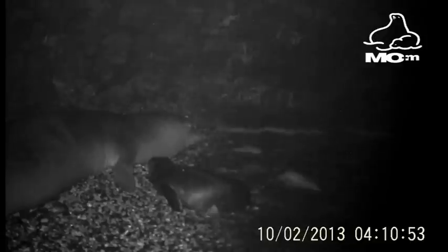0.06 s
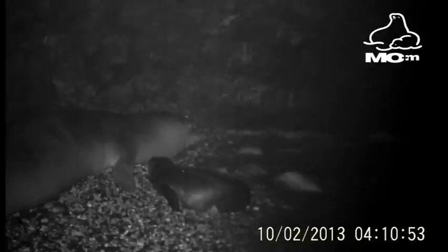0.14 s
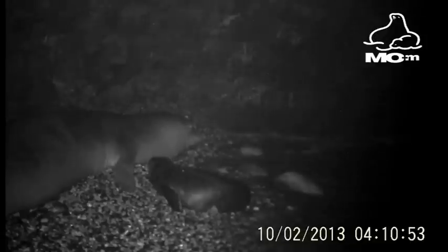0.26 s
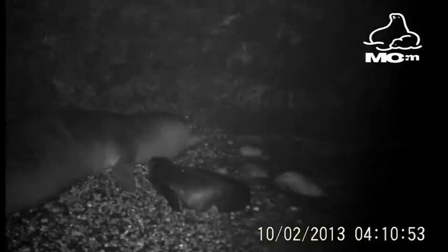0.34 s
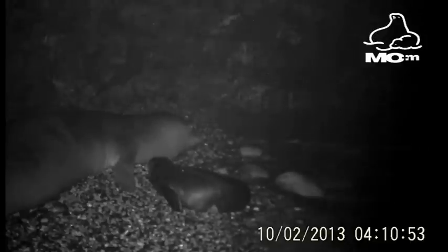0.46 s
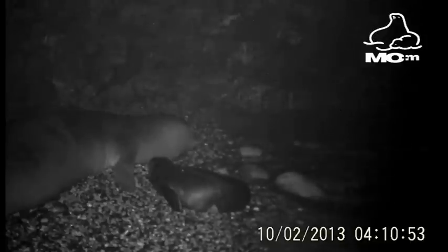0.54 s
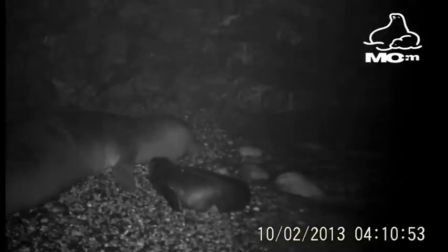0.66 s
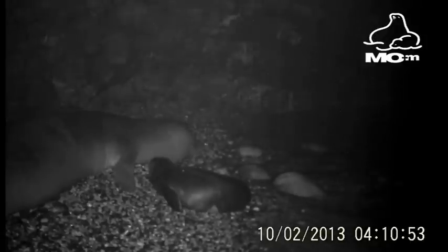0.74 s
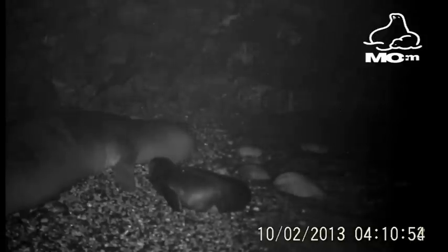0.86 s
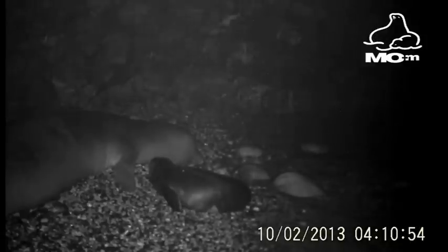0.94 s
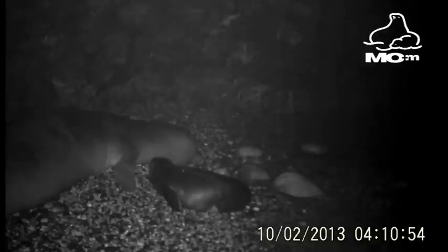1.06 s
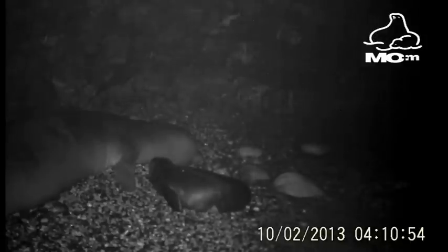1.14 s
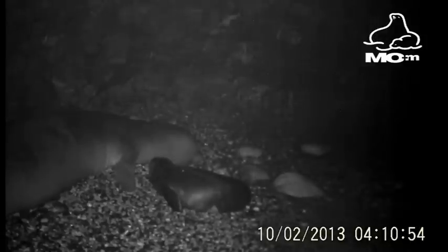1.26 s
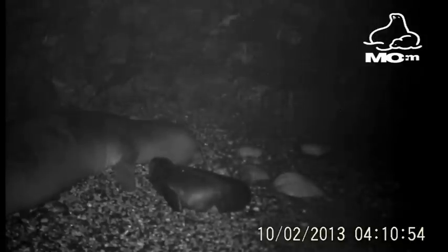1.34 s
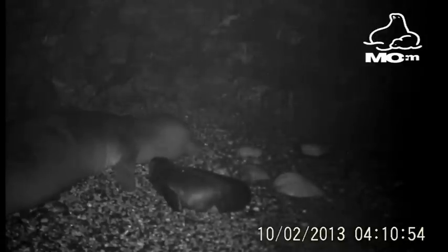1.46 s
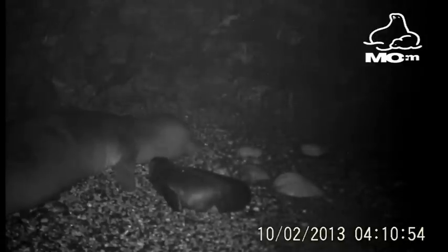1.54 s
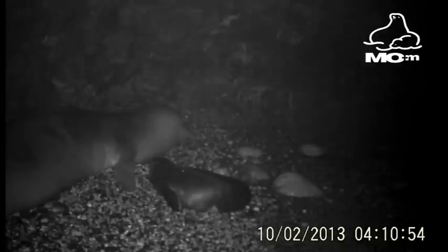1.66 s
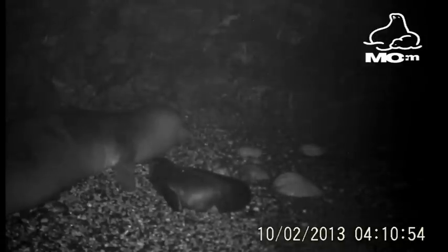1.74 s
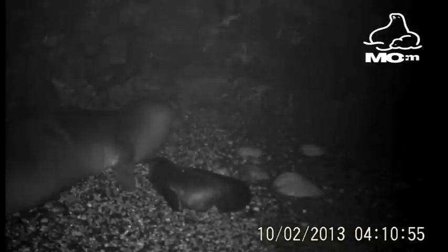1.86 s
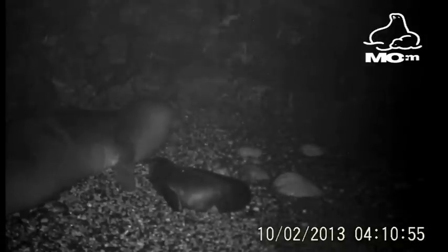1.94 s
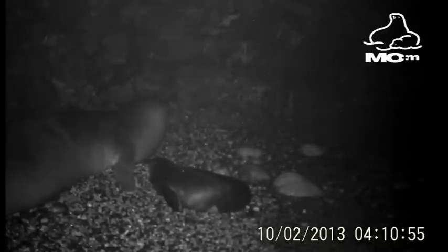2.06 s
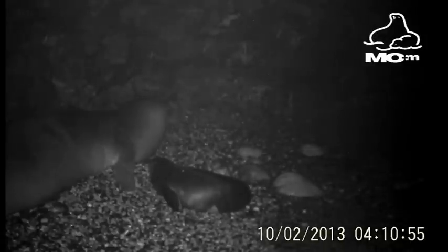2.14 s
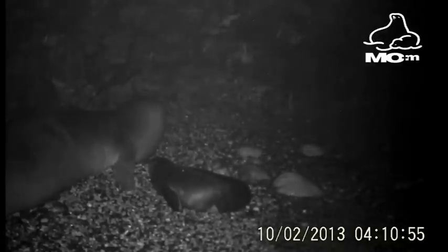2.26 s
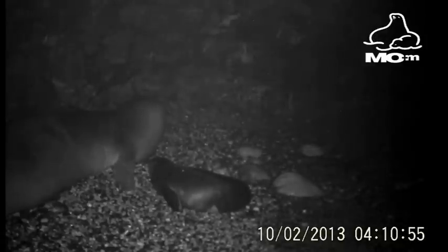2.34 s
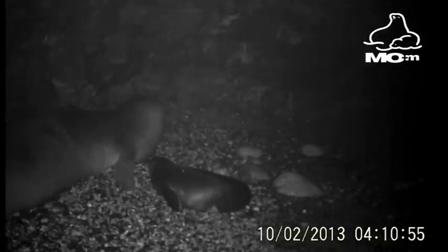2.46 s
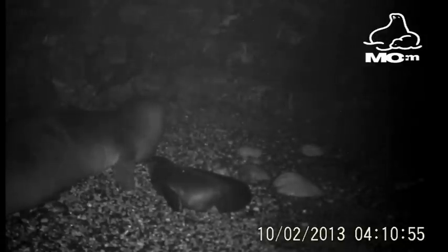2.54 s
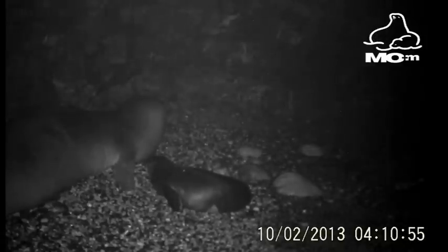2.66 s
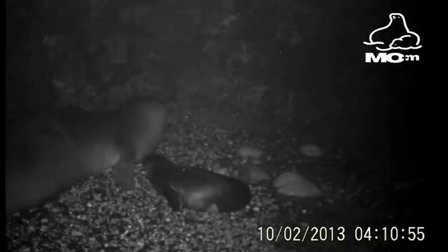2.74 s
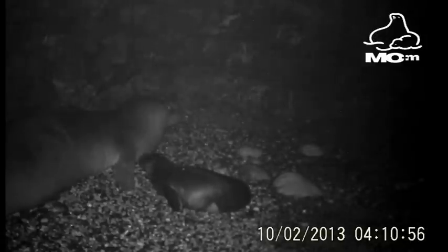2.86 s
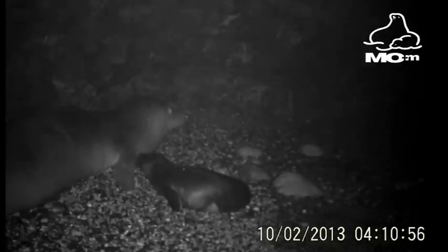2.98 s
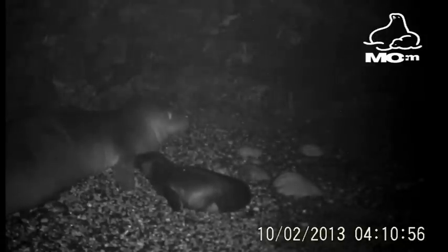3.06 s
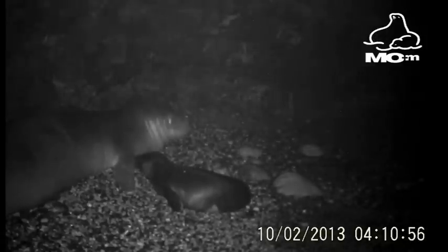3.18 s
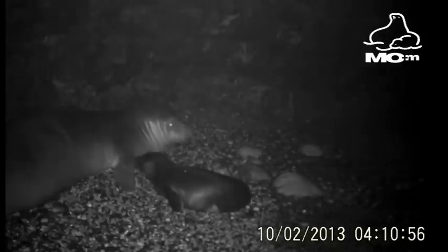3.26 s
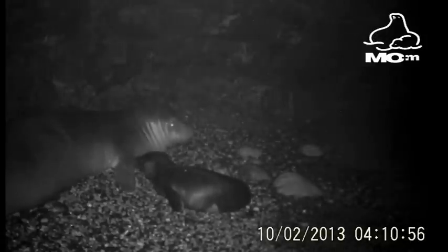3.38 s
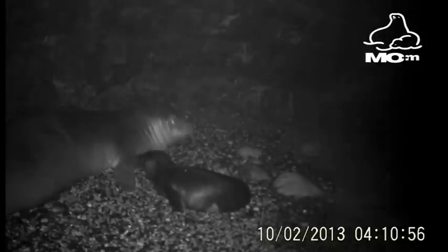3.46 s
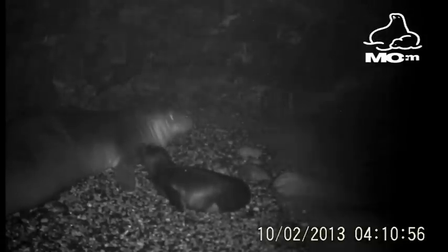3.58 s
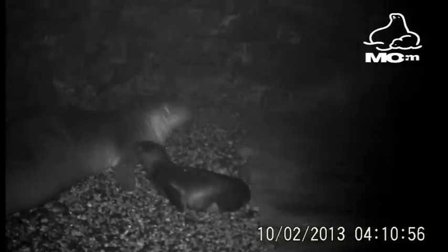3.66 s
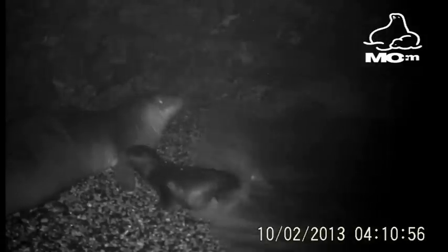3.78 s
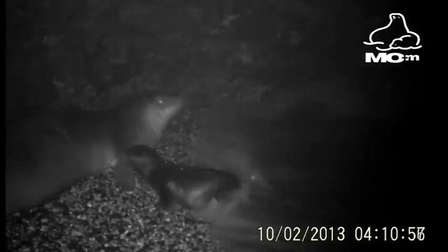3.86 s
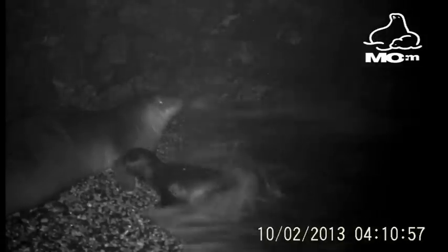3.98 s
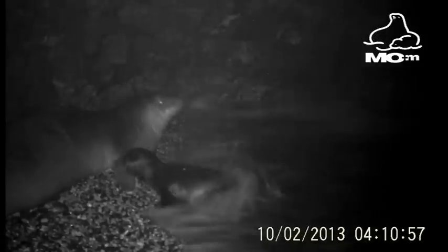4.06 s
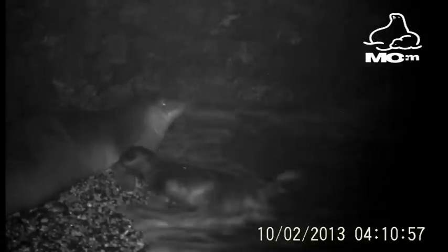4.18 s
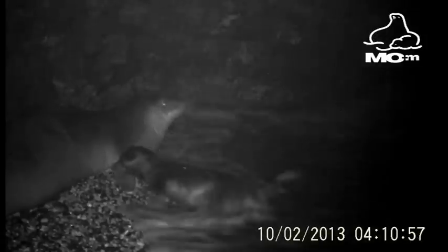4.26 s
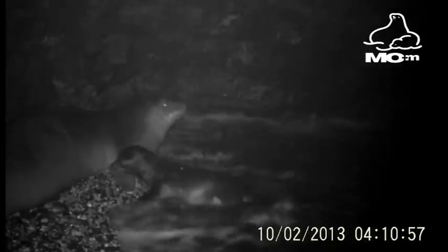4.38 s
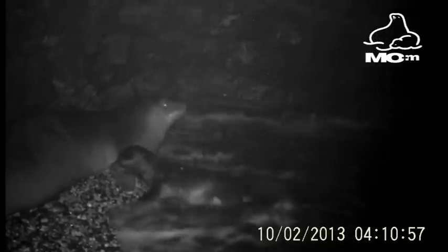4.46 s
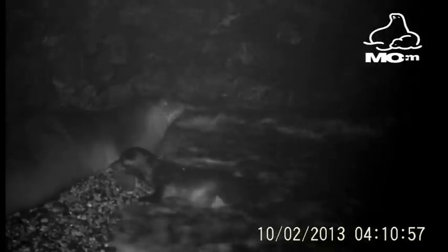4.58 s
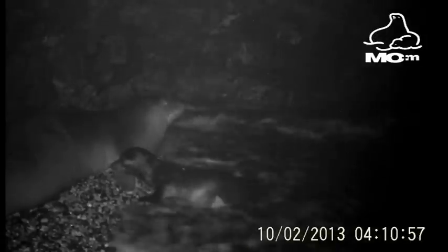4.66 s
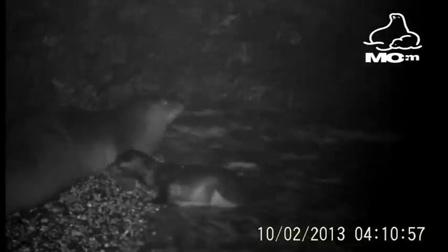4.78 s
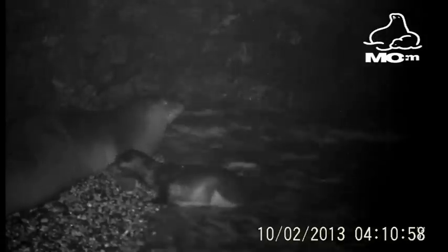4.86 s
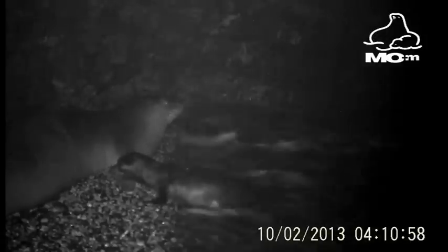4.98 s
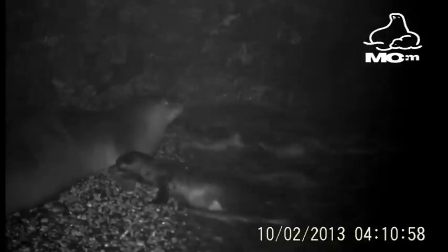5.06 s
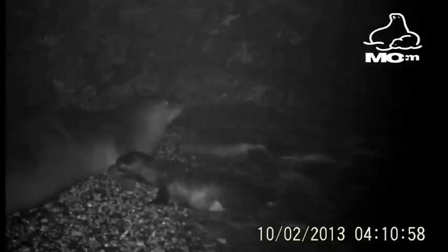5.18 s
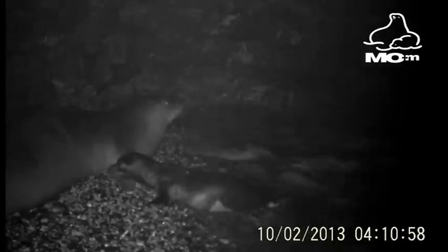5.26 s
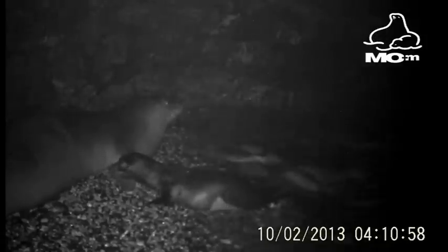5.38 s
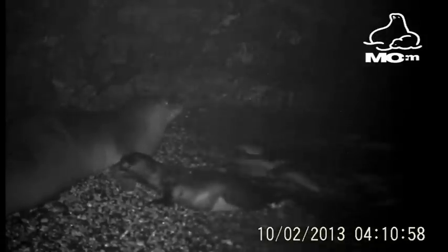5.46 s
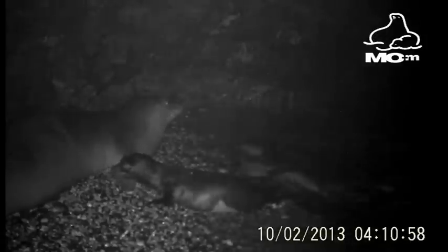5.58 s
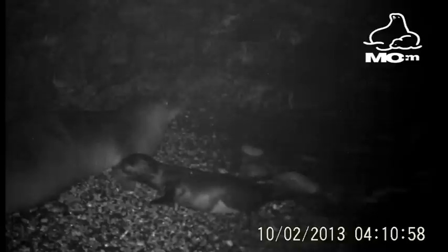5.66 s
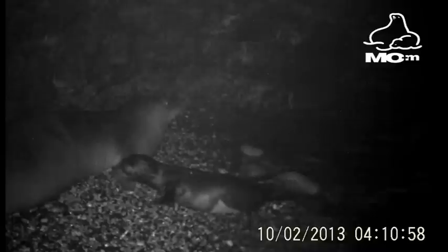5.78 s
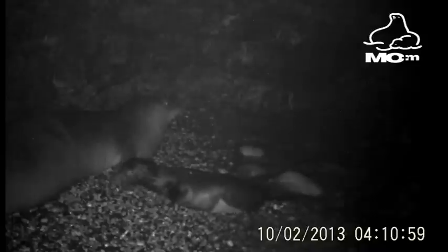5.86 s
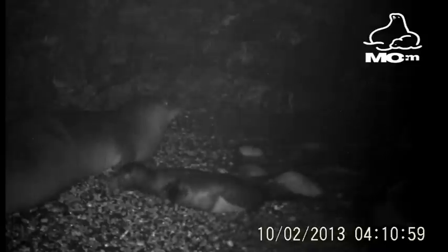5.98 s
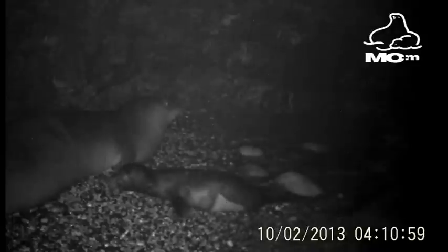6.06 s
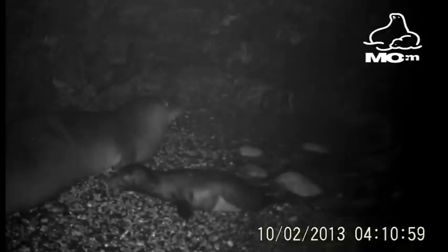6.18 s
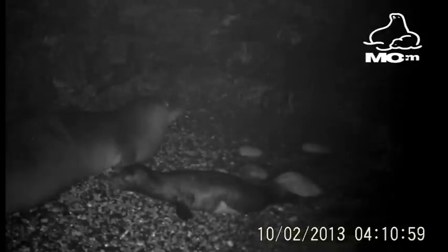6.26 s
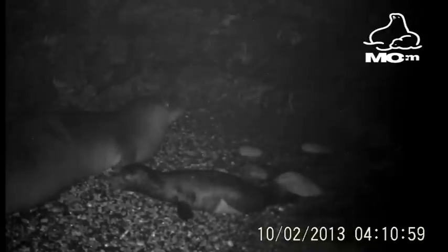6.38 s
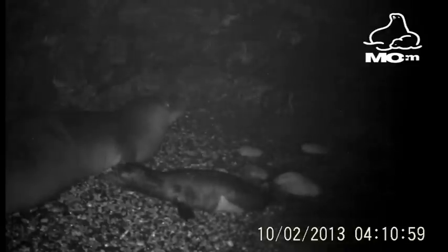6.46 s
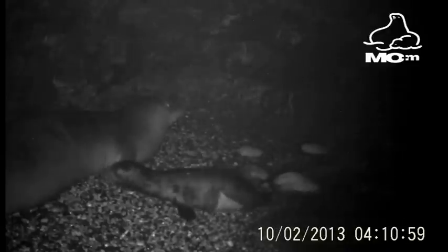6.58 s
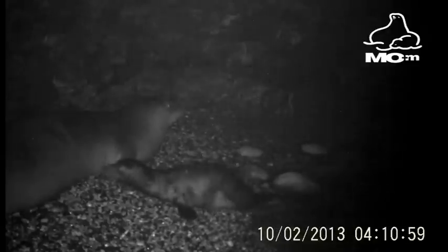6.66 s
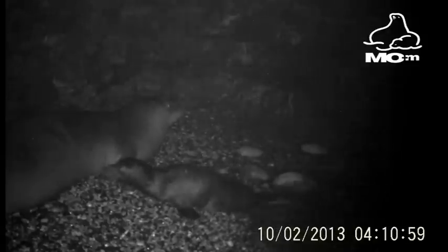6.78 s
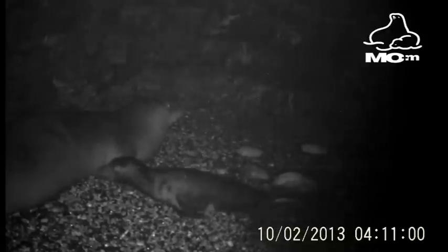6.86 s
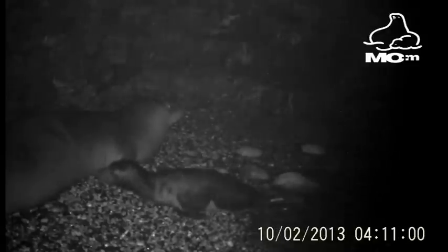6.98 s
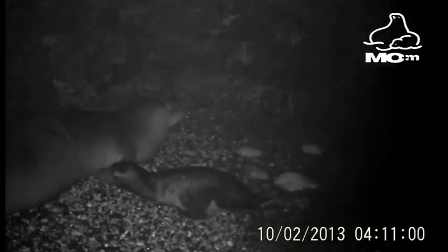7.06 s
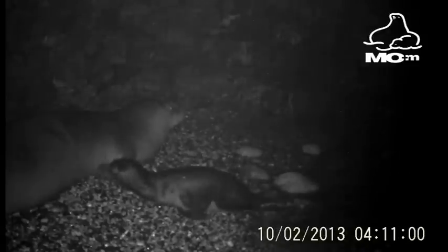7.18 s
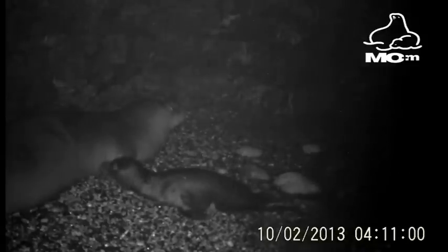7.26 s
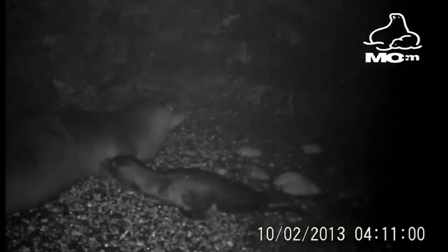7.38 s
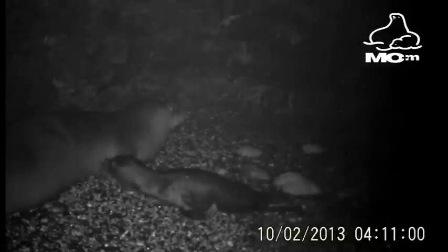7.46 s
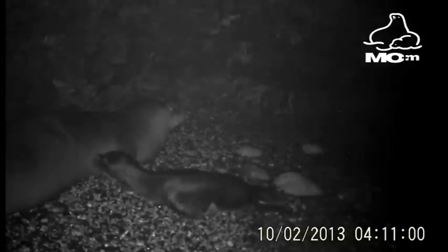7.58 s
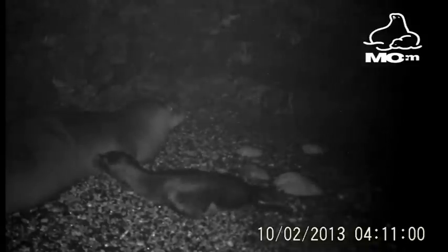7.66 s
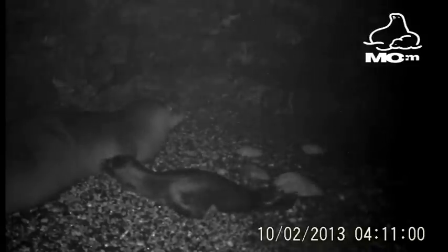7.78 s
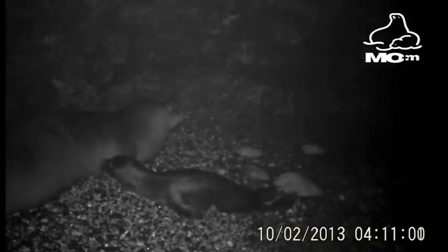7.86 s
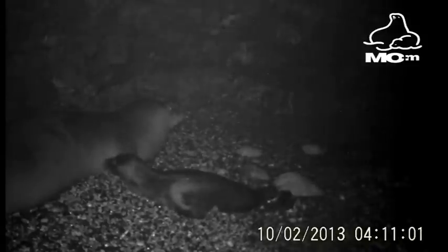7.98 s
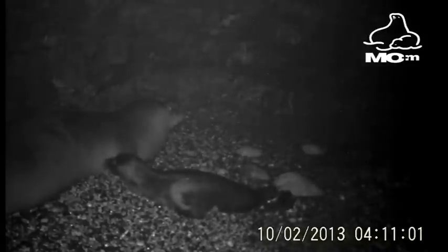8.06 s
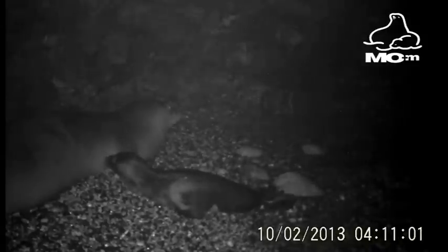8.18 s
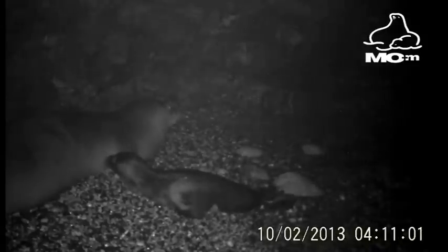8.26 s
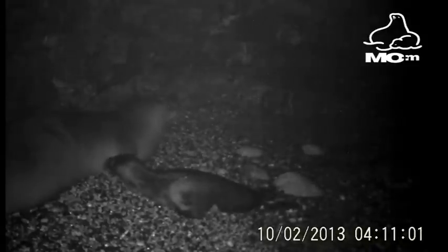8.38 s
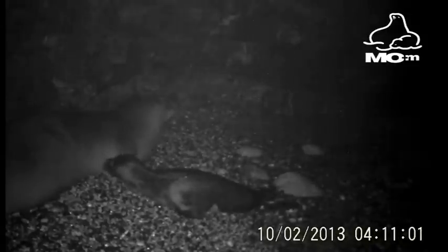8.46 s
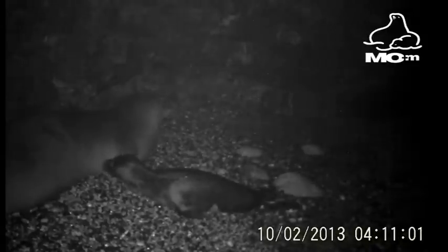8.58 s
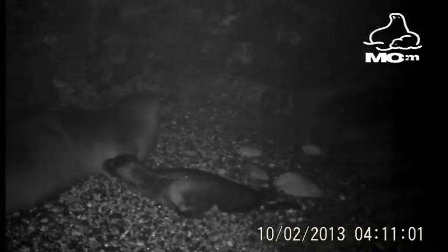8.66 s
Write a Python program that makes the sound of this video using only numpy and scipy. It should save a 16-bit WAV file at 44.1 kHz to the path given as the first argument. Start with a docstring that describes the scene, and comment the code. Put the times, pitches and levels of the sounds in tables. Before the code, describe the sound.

Sea water gurgles and splashes in a rocky cave, with two swells surging in and foaming over the pebbles.

```python
"""Water gurgles and splashes in a rocky sea cave, then swells surge in and break on the shingle.
Pockets of trapped air slosh and gulp, foam seethes over the pebbles, spray hisses, and underneath
the water mass booms in the cave air. One microphone: near bubbles ring singly, distant ones merge
into a wash, and the rock walls smear the splashes, gulps and ringing booms a little."""
import sys
import numpy as np
from scipy import signal
from scipy.fft import rfft, irfft, next_fast_len
from scipy.io import wavfile

SR = 44100
rng = np.random.default_rng(int(sys.argv[2]) if len(sys.argv) > 2 else 0)


def materialize(psi):
    """Save the field psi as 16-bit PCM at rate SR to the path in sys.argv[1].

    A 1-D psi becomes a single channel; in a 2-D psi each row is a channel.
    """
    bounded = np.clip(np.atleast_2d(psi).T, -1, 1)
    quanta = np.round(bounded * 32767).astype(np.int16)
    wavfile.write(sys.argv[1], SR, quanta)


N = 384988

# churning water: t/s, slosh of large air pockets/dB, gurgle of smaller ones/dB
CHURN_LEVELS = [(0.0, -46.5, -47), (0.58, -46.5, -42), (1.0, -45, -42.5), (1.58, -49, -46),
                (2.89, -38.5, -36), (3.06, -33, -31), (3.23, -32.5, -28), (3.55, -44.5, -37),
                (4.01, -38.5, -37.5), (4.3, -46, -42.5), (4.6, -46.5, -41.5), (4.84, -40, -40.5),
                (5.91, -44.5, -45.5), (6.15, -51, -40), (6.61, -44.5, -47), (7.15, -51, -48.5),
                (7.76, -49, -41), (8.12, -31.5, -31), (8.24, -28, -28.5), (8.41, -26, -28),
                (8.58, -31.5, -28.5), (8.73, -29.5, -33.5)]
# white water: t/s, foam on the shingle/dB, fine spray/dB
WHITE_WATER_LEVELS = [(0.0, -43.5, -44.5), (0.34, -46.5, -41.5), (0.58, -40.5, -39), (0.95, -42, -40),
                      (1.41, -47, -46), (1.73, -45, -45.5), (2.48, -39.5, -38.5), (2.63, -36.5, -38.5),
                      (2.89, -32, -34), (3.09, -28.5, -33.5), (3.21, -29.5, -30.5), (3.5, -29.5, -35.5),
                      (3.84, -30, -36.5), (4.23, -35, -44), (4.38, -39.5, -45.5), (4.71, -40.5, -43),
                      (5.54, -39, -36.5), (5.93, -40.5, -38), (6.2, -37, -39), (6.64, -44, -42.5),
                      (7.1, -43, -45.5), (7.34, -44, -42.5), (7.73, -43.5, -40), (8.0, -35, -34.5),
                      (8.09, -33, -35), (8.34, -29, -32), (8.73, -30.5, -35.5)]
# wavelets slapping over the stones, at their peaks: t/s, slosh/dB, gurgle/dB, foam/dB
WAVELET_SLAPS = [(.32, -45, -55, -54), (.39, -37.5, -43, -44), (.78, -46, -39, -40.5), (.87, -39, -53, -55),
                 (1.09, -36.5, -37, -37.5), (1.3, -44, -42, -43), (1.43, -50, -51, -51),
                 (1.6, -51, -60, -46), (1.75, -38.5, -49, -42.5), (2.06, -40, -46, -56),
                 (2.23, -41, -44, -52), (2.6, -42, -53, -46), (2.9, -34, -31.5, -34),
                 (3.03, -24.5, -29, -30.5), (3.35, -29.5, -29, -31.5), (3.57, -43, -35, -39),
                 (3.82, -49, -36, -36), (3.91, -43, -36, -34.5), (5.57, -42, -40.5, -43),
                 (5.63, -43, -38, -43), (6.01, -37.5, -37, -43), (6.2, -38, -45, -50),
                 (6.25, -40, -40, -50), (6.47, -48, -40.5, -42.5), (6.83, -50, -45, -44.5),
                 (6.95, -52, -38.5, -42.5), (7.05, -39.5, -41, -47), (7.17, -35, -40.5, -53),
                 (7.49, -51, -46, -48), (7.76, -44, -45, -40), (8.03, -31, -36, -36.5),
                 (8.24, -37, -34, -41), (8.43, -34, -31, -38)]
# splashes on rock: t/s, level/dB, f/Hz, rise/s, time to fall 60 dB/s
ROCK_SPLASHES = [(0.369, -29, 2500, .012, 0.16), (.52, -37, 4500, .0005, .03),
                 (0.5353, -19.5, 2600, 0.00055, 0.016), (0.537, -34, 2500, 0.0011, .1),
                 (.829, -39, 3000, .002, 0.063), (0.988, -27, 2000, 0.0011, 0.033),
                 (1.072, -31, 900, 0.0035, 0.073), (1.43, -36, 3500, 0.0016, .1),
                 (1.68, -29, 5000, 0.018, .2), (1.706, -28.5, 3500, .002, 0.077),
                 (1.885, -35, 4000, .002, .06), (2.994, -16, 500, .004, 0.095),
                 (4.49, -34.5, 6000, .01, 0.16), (5.57, -26.5, 400, .01, 0.11),
                 (5.624, -27, 800, .005, 0.088), (6.226, -26, 700, .005, 0.092),
                 (6.715, -34, 4000, .002, .06), (6.831, -33, 2000, .006, 0.11),
                 (6.919, -35, 4000, 0.0023, 0.042), (7.042, -25.5, 600, .004, 0.12),
                 (7.48, -36, 2500, 0.0073, 0.099), (7.71, -31, 4000, .01, 0.23),
                 (7.938, -26.5, 1200, .003, 0.11), (8.187, -20, 2500, .004, 0.14)]
# air pockets gulping, drops plopping, low ringing booms of the cave air: t/s, peak/dB, starting f/Hz
GULPS_AND_BOOMS = [(.2049, -39, 4263), (.3035, -27.5, 216), (.33, -31, 210), (.3791, -33, 646),
                   (0.384, -33, 120), (.4834, -38, 480), (.732, -32, 238), (.7526, -29, 250),
                   (.828, -34, 370), (.921, -32, 610), (.97, -37, 135), (1.084, -31, 112), (1.155, -38, 65),
                   (.9517, -32, 427), (1.0763, -26.5, 504), (1.2839, -35, 710), (1.4309, -34, 4800),
                   (1.73, -36, 375), (2.2232, -30, 210), (2.32, -36, 38), (2.87, -27, 204),
                   (2.9956, -16.5, 184), (2.9961, -32, 594), (3.13, -29, 55), (3.29, -27, 64),
                   (3.3201, -25, 580), (3.36, -33, 64), (3.326, -24, 173), (3.369, -36, 256),
                   (3.8329, -31, 4300), (3.915, -27, 249), (4.86, -34, 31), (4.92, -37, 32),
                   (4.931, -35, 109), (5.03, -29.5, 32), (5.05, -30.5, 62.4), (5.551, -34, 674),
                   (5.603, -32, 334), (5.625, -32, 620), (6.1753, -32.5, 1227), (6.1942, -44, 210),
                   (6.228, -34, 660), (6.8439, -34, 2060), (7.0418, -26, 110), (7.1529, -27, 1130),
                   (7.163, -35, 1240), (7.2042, -30.5, 370), (7.466, -32, 156), (7.4929, -35, 2433),
                   (7.75, -30.5, 134), (7.7692, -30, 550), (8.0079, -29, 2050), (8.1999, -21, 1350),
                   (8.2332, -16.5, 192), (8.3818, -21, 195), (8.552, -18.5, 219)]
# swells thudding into the cave mouth, at their peaks: t/s, fall/s, deep heave/dB, boom/dB
SWELL_THUDS = [(.73, 0.071, -47, -38), (1.17, 0.059, -53, -37), (1.9, 0.092, -48, -47),
               (2.34, 0.15, -37, -52), (2.87, .05, -46, -60), (3.04, 0.07, -35, -32.5),
               (3.31, 0.1, -46, -32.5), (4.25, .08, -55, -43.5), (4.88, .2, -43, -38.5),
               (5.15, 0.073, -42, -41.5), (5.55, 0.076, -41.5, -34), (5.96, .1, -39, -38.5),
               (7.05, 0.071, -39, -33.5), (7.4, .15, -43, -48), (7.94, .08, -44, -36.5),
               (8.08, 0.17, -37, -43), (8.56, 0.053, -35, -32.5)]
# the colour of each layer: f/Hz, relative level/dB
SLOSH_SPECTRUM = [(60, -26), (110, -2.5), (170, -1.5), (218, 3.5), (265, 0.5), (340, -12.5), (600, -37)]
GURGLE_SPECTRUM = [(200, -36), (330, 1), (450, 0), (620, -1), (850, -5), (1200, -12), (2500, -26)]
FOAM_SPECTRUM = [(400, -22.5), (800, -6), (1200, -2), (1700, -2), (2600, -4), (3600, -9), (5500, -13.5),
                 (11000, -47)]
SPRAY_SPECTRUM = [(1200, -33), (2500, -4), (3600, -2.5), (5000, -3), (6500, -6), (8000, -9), (11000, -15)]
HEAVE_SPECTRUM = [(15, -5), (27, 7), (38, 5), (50, -2.5), (90, -49)]
BOOM_SPECTRUM = [(30, -32.5), (48, -4), (64, -1.5), (85, -8), (120, -12.5), (250, -47)]

SLAP_SPRAY_DB = -2.5   # spray thrown by a slap, against its foam
RING_SHORTEST_S, RING_CYCLES, RING_GLIDE = .0027, 1.05, .015   # glide: log pitch ratio per swell time
HEAVE_REST_DB, BOOM_REST_DB, RUMBLE_WAVER_DB = -54, -54.5, 5.5   # rumble between thuds
CAVE_T60_S, ROCK_CUT_HZ, CAVE_DB = .29, 7500, -12
PREAMP_OFFSET, CUTOFF_HZ = .0026, 10130


def churn(slosh_slaps, gurgle_slaps):
    """Air trapped in the churning water rings: large pockets slosh, smaller ones gurgle."""
    slosh_db, gurgle_db = in_time(CHURN_LEVELS)
    slosh = bubbles(SLOSH_SPECTRUM, per_s=700, cycles=2.8, spread_db=3.7, far_share=.68, clump_db=-2.6)
    gurgle = bubbles(GURGLE_SPECTRUM, per_s=900, cycles=16.4, spread_db=3.2, far_share=.75, clump_db=.15)
    return gain(slosh_db, slosh_slaps) * slosh + gain(gurgle_db, gurgle_slaps) * gurgle


def white_water(foam_slaps):
    """Small bubbles burst by the thousand: foam seethes on the shingle and spray hisses above it."""
    foam_db, spray_db = in_time(WHITE_WATER_LEVELS)
    foam = bubbles(FOAM_SPECTRUM, per_s=4000, cycles=4.3, spread_db=1.3, far_share=.77, clump_db=.83)
    spray = bubbles(SPRAY_SPECTRUM, per_s=9000, cycles=7.3, spread_db=3, far_share=.72, clump_db=.6)
    thrown = foam_slaps * from_db(SLAP_SPRAY_DB) ** 2
    return gain(foam_db, foam_slaps) * foam + gain(spray_db, thrown) * spray


def bubbles(spectrum, per_s, cycles, spread_db, far_share, clump_db):
    """Near bubbles burst at random and ring down 60 dB in `cycles`; far ones merge into noise. Rms 1."""
    sizes = from_db(spread_db * np.minimum(rng.exponential(1, N), 4)) * rng.choice([-1, 1], N)
    born = rng.random(N) < per_s / SR
    pitch_index = rng.integers(0, 14, N)
    ringing = 0
    for k, hz in enumerate(np.geomspace(spectrum[0][0], spectrum[-1][0], 14)):
        decay = from_db(-60 * hz / (cycles * SR))
        resonator = [1, -2 * decay * np.cos(2 * np.pi * hz / SR), decay * decay]
        kicks = sizes * born * (pitch_index == k) + 1e-18
        ringing += np.sqrt(hz) * rms_one(signal.lfilter([1, 0, -1], resonator, kicks))   # even power/Hz
    near = np.sqrt(1 - far_share) * coloured(ringing, spectrum)
    far = np.sqrt(far_share) * coloured(rng.standard_normal(N), spectrum)
    clumping = from_db(clump_db * drift(18))
    return rms_one((near + far) * clumping)


def slaps():
    """Wavelets slap over the stones and set the trapped air going: power of slosh, gurgle and foam."""
    times, *peaks_db = np.transpose(WAVELET_SLAPS)
    return bursts(times, peaks_db, rise_s=.029, fall_s=.038)


def splashes():
    """Water hits rock: a band of noise rises fast and dies away; the shortest ones crack."""
    out, t = np.zeros(N), np.arange(SR // 2) / SR
    for s, level_db, hz, rise_s, t60_s in ROCK_SPLASHES:
        start = round(s * SR)
        band = signal.butter(1, [hz / 3.6, hz * 1.26], "band", fs=SR, output="sos")
        noise = rms_one(signal.sosfilt(band, rng.standard_normal(len(t))))
        envelope = from_db(level_db - 60 * t / t60_s) * (1 - np.exp(-t / rise_s))
        out[start:start + len(t)] += (envelope * noise)[:N - start]
    return out


def gulps_and_booms():
    """Air pockets gulp, drops plop, the cave air booms low: each a slightly rising tone that dies away."""
    out, t = np.zeros(N), np.arange(SR // 5) / SR
    for s, level_db, hz in GULPS_AND_BOOMS:
        start = round(s * SR)
        swell_s = RING_SHORTEST_S + RING_CYCLES / hz   # low tones are slower
        age = t / swell_s
        pitch_hz = hz * np.exp(RING_GLIDE * np.minimum(age, 4))
        tone = np.sin(2 * np.pi * np.cumsum(pitch_hz) / SR)
        envelope = from_db(level_db) * age * np.exp((1 - age ** 1.5) / 1.5)
        out[start:start + len(t)] += (envelope * tone)[:N - start]
    return out


def swell_rumble():
    """Swells thud into the cave mouth and the air inside heaves and booms; between thuds it rumbles."""
    times, fall_s, *peaks_db = np.transpose(SWELL_THUDS)
    heave_thuds, boom_thuds = bursts(times, peaks_db, rise_s=.045, fall_s=fall_s)
    heave_gain = gain(HEAVE_REST_DB + RUMBLE_WAVER_DB * drift(1.5), heave_thuds)
    heave = coloured(rng.standard_normal(N), HEAVE_SPECTRUM)
    boom_gain = gain(BOOM_REST_DB + RUMBLE_WAVER_DB * drift(2.7), boom_thuds)
    boom = coloured(rng.standard_normal(N), BOOM_SPECTRUM)
    return heave_gain * heave + boom_gain * boom


def cave_echo(x):
    """The walls return a dense tail, 8 ms behind the direct sound and dulled by the wet stone."""
    t = np.arange(SR) / SR
    tail = rng.standard_normal(SR) * from_db(-60 * t / CAVE_T60_S) * (t > .008)
    tail = signal.sosfilt(signal.butter(1, ROCK_CUT_HZ, fs=SR, output="sos"), tail)
    return signal.fftconvolve(x, tail / np.sqrt(np.sum(tail ** 2)))[:N]


def bursts(times, peaks_db, rise_s, fall_s):
    """Power envelopes, one per dB column: each event climbs to its peak and falls away."""
    grid = np.arange(0, N + 100, 100)
    since_peak = grid[:, None] / SR - times
    shapes = np.exp(-np.where(since_peak < 0, -since_peak / rise_s, since_peak / fall_s))
    return [np.interp(np.arange(N), grid, shapes @ from_db(db) ** 2) for db in peaks_db]


def gain(steady_db, burst_power):
    """Amplitude of a steady part with bursts on top."""
    return np.sqrt(from_db(steady_db) ** 2 + burst_power)


def drift(rate_hz):
    """Slow random wander: coarse noise through two one-pole low-passes; rms 1."""
    step, run_in = 40, 2000
    pole = np.exp(-2 * np.pi * rate_hz * step / SR)
    noise = rng.standard_normal(N // step + run_in + 2)
    slow = signal.lfilter([1], [1, -2 * pole, pole * pole], noise)[run_in:]
    return np.interp(np.arange(N) / step, np.arange(len(slow)), rms_one(slow))


def coloured(x, spectrum):
    """Shape a sound by a spectrum drawn on a log-frequency axis; rms 1."""
    size = next_fast_len(N)
    hz = np.arange(size // 2 + 1) * SR / size + 1
    points_hz, points_db = np.transpose(spectrum)
    gain_db = np.interp(np.log(hz), np.log(points_hz), points_db, left=-90)
    return rms_one(irfft(rfft(x, size) * from_db(gain_db), size)[:N])


def in_time(rows):
    """One curve per level column, joining its points in time."""
    times, *columns = np.transpose(rows)
    return [np.interp(np.arange(N) / SR, times, column) for column in columns]


def from_db(db):
    return 10 ** (np.asarray(db) / 20)


def rms_one(x):
    return x / np.sqrt(np.mean(x ** 2) + 1e-20)


def scene():
    """The water and the echoes of its single events at one microphone, the same on both channels."""
    rumble = swell_rumble()
    slosh_slaps, gurgle_slaps, foam_slaps = slaps()
    surf = churn(slosh_slaps, gurgle_slaps) + white_water(foam_slaps)
    events = splashes() + gulps_and_booms()
    water = surf + events + rumble + from_db(CAVE_DB) * cave_echo(events)
    return np.array([water, water])


def record(dry):
    """The microphone's preamplifier sits slightly off zero, and the top is cut steeply."""
    low_pass = signal.ellip(14, .3, 85, CUTOFF_HZ, fs=SR, output="sos")
    return signal.sosfilt(low_pass, dry + PREAMP_OFFSET)


dry = scene()
out = record(dry)
materialize(out)
```